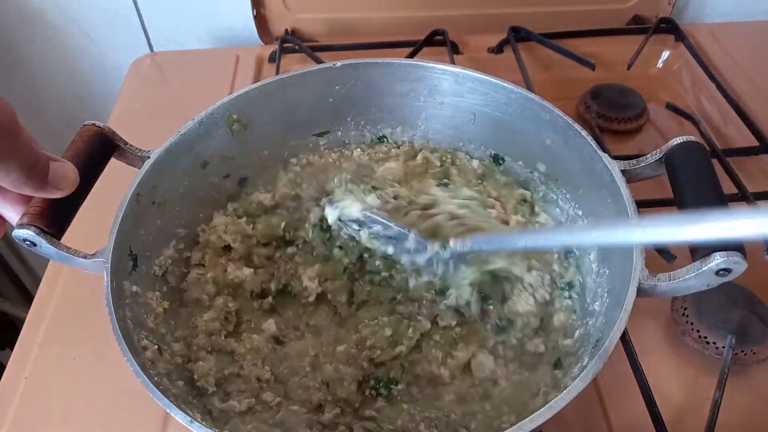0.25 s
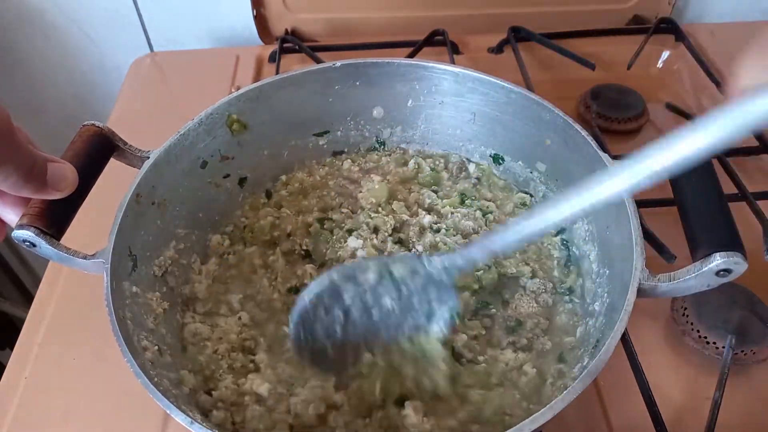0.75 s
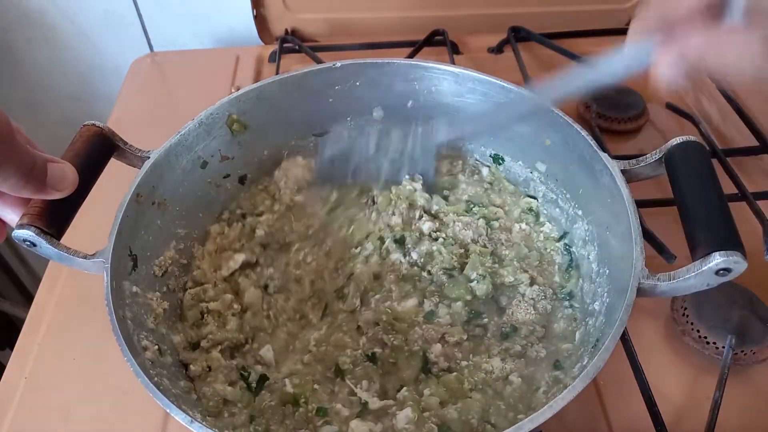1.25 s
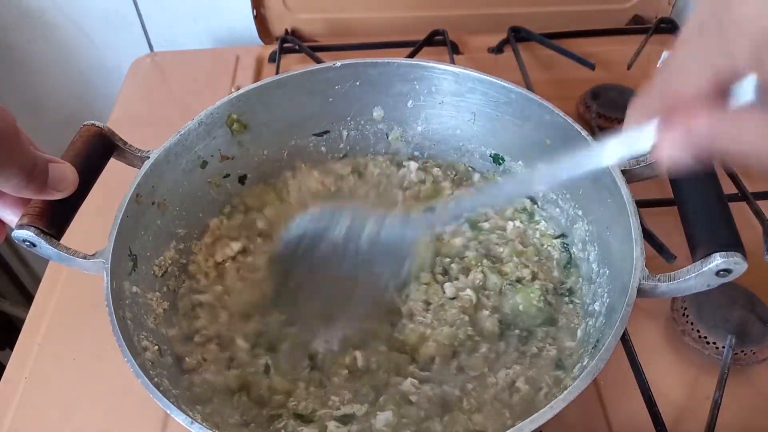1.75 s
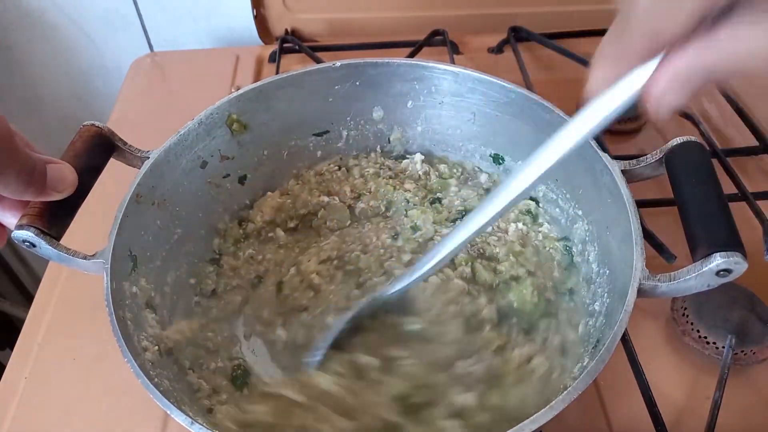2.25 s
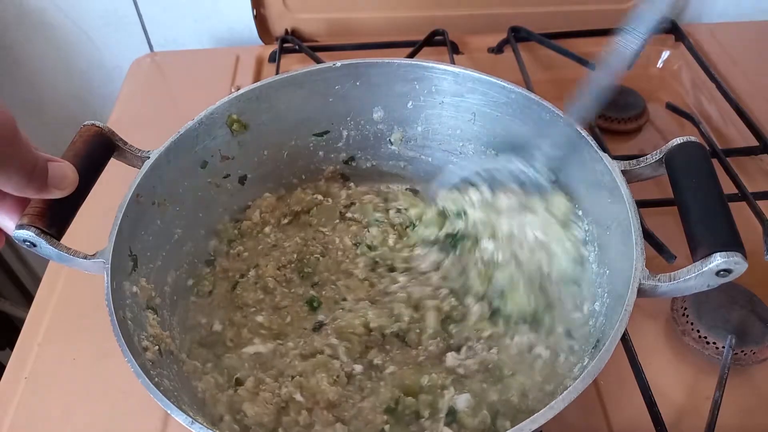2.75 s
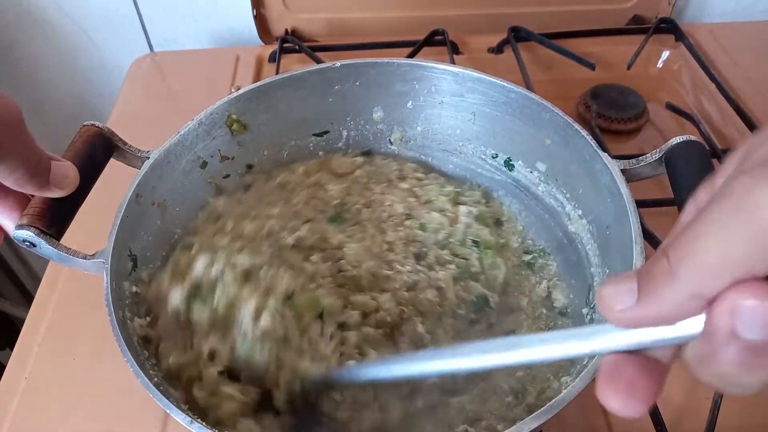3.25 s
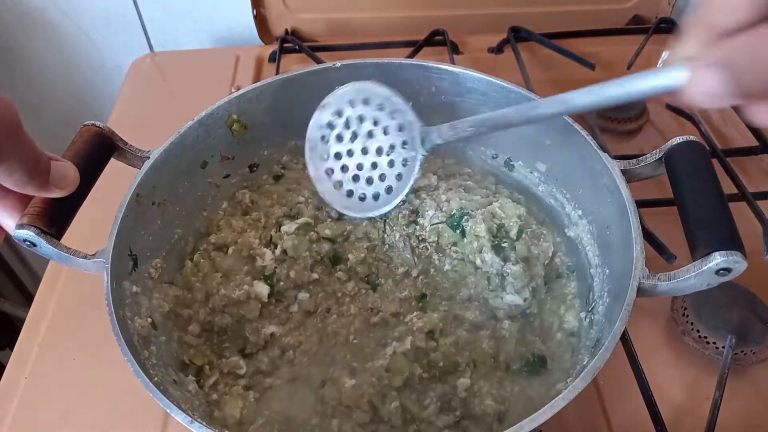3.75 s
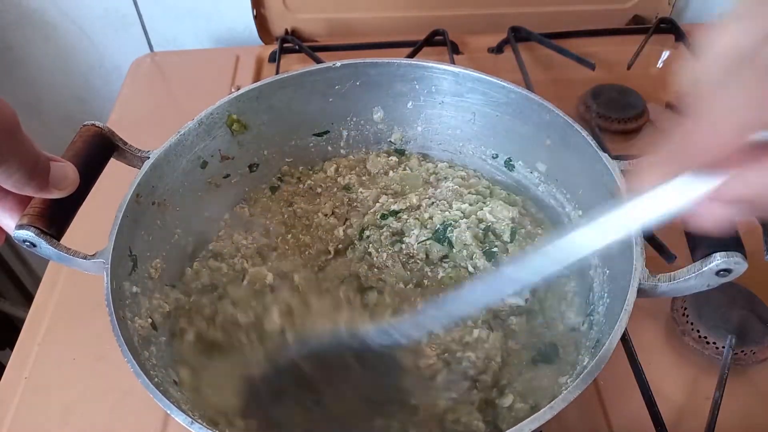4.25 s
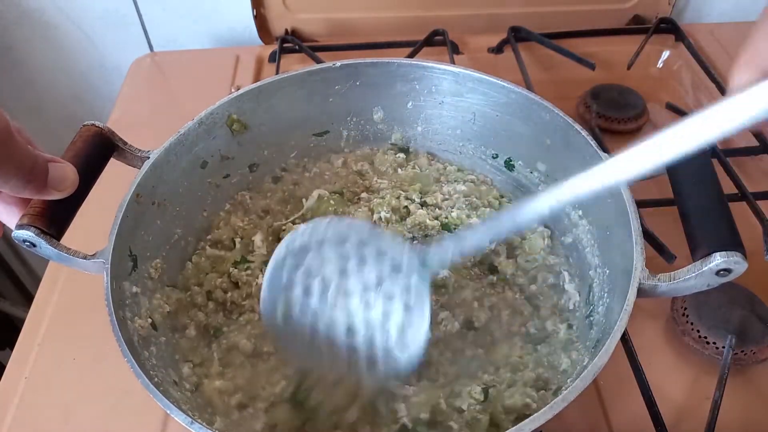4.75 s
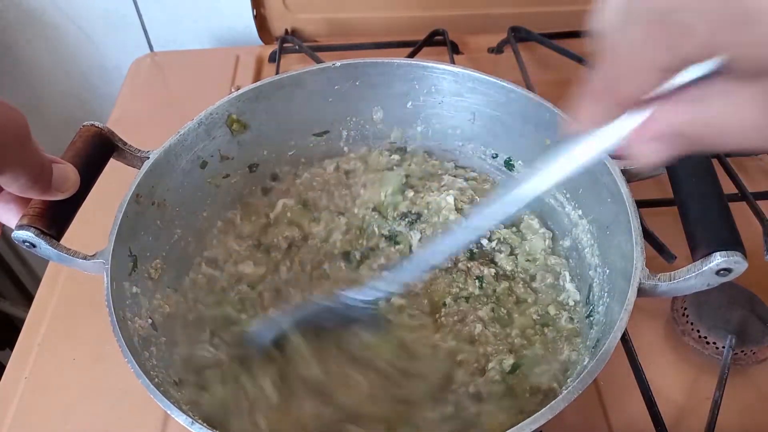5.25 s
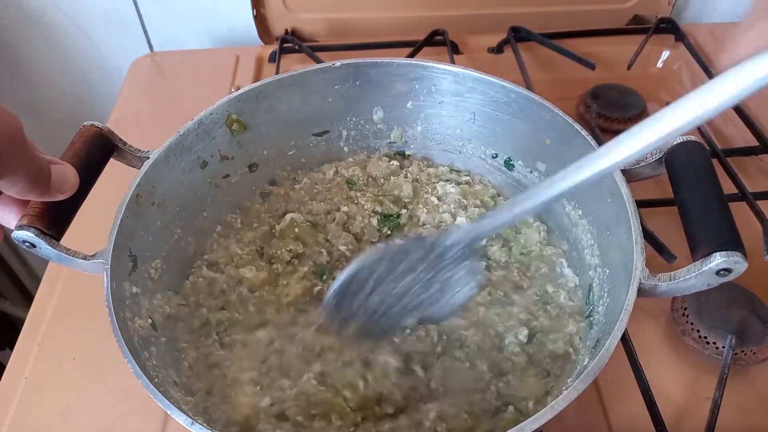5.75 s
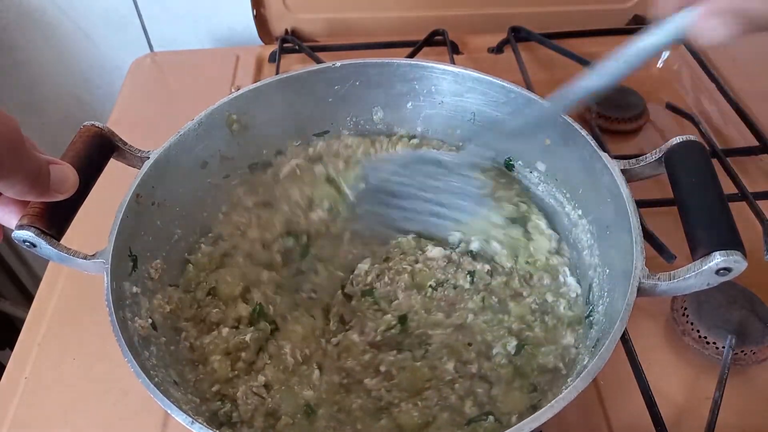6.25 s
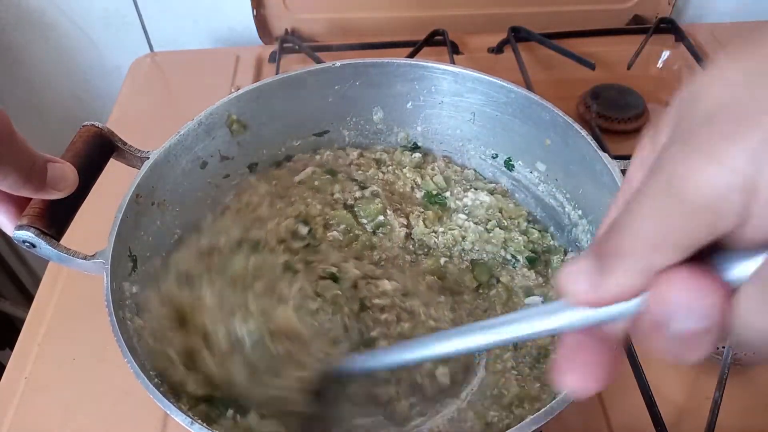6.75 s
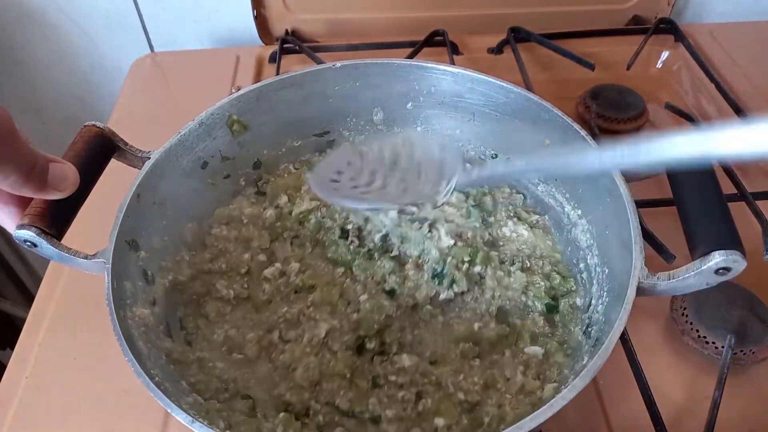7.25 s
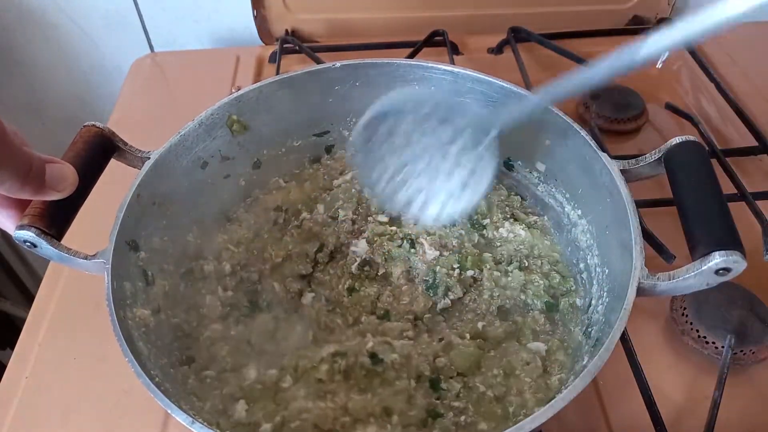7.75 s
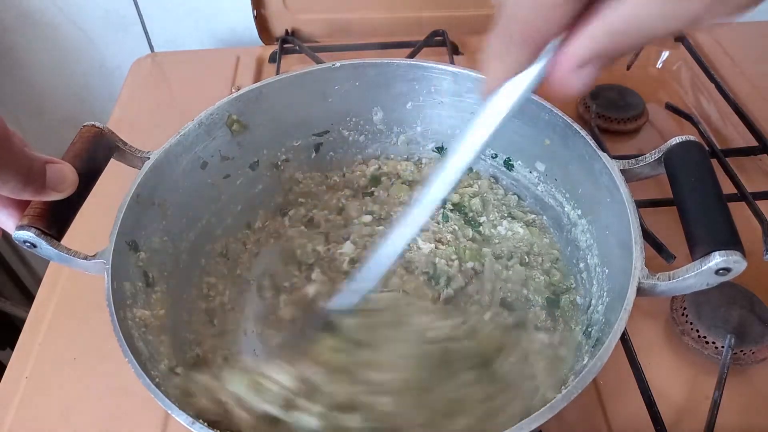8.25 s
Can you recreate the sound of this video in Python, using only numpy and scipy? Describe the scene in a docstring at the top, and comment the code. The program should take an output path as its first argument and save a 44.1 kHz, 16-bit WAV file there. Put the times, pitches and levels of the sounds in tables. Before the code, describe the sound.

A slotted metal spoon stirs thick wet mash in an aluminium pot, heard close in a hard-walled kitchen. After a few small clicks, the spoon knocks the pot about every third of a second from 0.6 to 2 seconds, each blow giving a short, damped metallic ring. A brief scrape follows, then a longer grinding, rasping drag from 2.6 to 3.2 seconds. A firm knock lands at 3.9 seconds. From about 4.3 to 6.2 seconds it is much quieter, with faint sticky squelches and a soft patter of falling lumps. Two knocks and another rough scrape run from 6.3 to 6.8 seconds. The loudest knock comes at 7.5 seconds, and a last knock and sharp scrape at about 8 seconds. The room rings briefly after each blow, over a low hush and a faint hum.

```python
"""Knocks and grinding scrapes: a slotted metal spoon stirs thick wet mash in an aluminium pot on a stove.
Each knock rings the pot's modes, damped by the mash. Dragged round the wall, the edge sticks and slips,
rasping where it bites bare metal. Between strokes the mash squelches faintly and drops off the spoon.
The hard-walled kitchen rings on after every blow, over a low hush and a faint hum."""
import sys
import numpy as np
from scipy import signal
from scipy.fft import rfft, irfft
from scipy.io import wavfile

SR = 44100
rng = np.random.default_rng(int(sys.argv[2]) if len(sys.argv) > 2 else 0)


def transcribe(u):
    """Save the signal u as a 16-bit wav file named by the first command-line argument.

    u: samples, shape (n,) or (channels, n), limited to [-1, 1]; the rate is SR.
    q: integer samples, one column per channel.
    """
    v = np.clip(np.atleast_2d(u).T, -1, 1)
    q = np.round(v * 32767).astype(np.int16)
    wavfile.write(sys.argv[1], SR, q)


N = 374409


def from_db(db):
    """Decibels to gain."""
    return 10 ** (np.asarray(db) / 20)


def unit_rms(x):
    """Scale to rms 1."""
    return x / np.sqrt(np.mean(x ** 2) + 1e-20)


def at_hz(points, hz):
    """Interpolate a table on a log-frequency axis."""
    f, value = np.transpose(points)
    return np.interp(np.log(np.maximum(hz, 1)), np.log(f), value)


def high_pass(x, hz):
    """Second-order Butterworth high-pass."""
    return signal.sosfilt(signal.butter(2, hz, "high", fs=SR, output="sos"), x)


def convolve(x, response):
    """Convolve per channel; shape (channels, N)."""
    return signal.oaconvolve(np.atleast_2d(x), np.atleast_2d(response), axes=-1)[:, :N]


def add(out, start_s, sound):
    """Mix sound into out at start_s."""
    i = max(round(start_s * SR), 0)
    out[i:i + len(sound)] += sound[:max(N - i, 0)]


def pulse(*colours, size=2048):
    """Minimum-phase pulse; its spectrum is the sum of the (f/Hz, level/dB) tables."""
    hz = np.arange(size // 2 + 1) * SR / size
    spectrum_db = sum(at_hz(colour, hz) for colour in colours)
    cepstrum = irfft(np.log(from_db(spectrum_db)))
    cepstrum[1:size // 2] *= 2
    cepstrum[size // 2 + 1:] = 0
    return irfft(np.exp(rfft(cepstrum)))


def unit_pulse(colour, *extras):
    """Pulse scaled to unit energy, then recoloured by the extras."""
    return pulse(colour, *extras) / np.linalg.norm(pulse(colour))


def envelope(contacts, attack_s, release_db_per_s, sag_db_per_s=0):
    """Power sum of contact envelopes: linear rise, sagging hold, exponential release."""
    power = np.zeros(N)
    for start_s, length_s, db in contacts:
        t = np.arange(N) / SR - start_s
        rise = np.clip(t / attack_s, 0, 1)
        fall_db = sag_db_per_s * np.maximum(t, 0) + release_db_per_s * np.maximum(t - length_s, 0)
        power += (rise * from_db(db - np.minimum(fall_db, 200))) ** 2
    return np.sqrt(power)


def drift(rate_hz):
    """Unit Gaussian values at rate_hz, joined linearly."""
    position = np.arange(N) * rate_hz / SR
    return np.interp(position, np.arange(N), rng.standard_normal(N))


def grains(per_s, spread_db, clump_db, clump_hz):
    """Random clicks of uneven size, swelling in clumps; rms 1."""
    fires = rng.random(N) < per_s / SR
    size_db = spread_db * np.minimum(rng.exponential(1, N), 4) + clump_db * drift(clump_hz)
    return unit_rms(fires * from_db(size_db) * rng.choice([-1, 1], N))


def stereo_noise(size):
    """White stereo noise, correlated in the bass, nearly independent in the treble."""
    # room sound field: f/Hz, left-right correlation
    coherence = [(60, 0.48), (250, 0.95), (500, 0.76), (900, -0.13), (2000, 0.023), (8000, 0.1)]
    mid, side = rfft(rng.standard_normal((2, size)))
    alike = np.clip(at_hz(coherence, np.arange(len(mid)) * SR / size), -1, 1)
    return irfft(np.sqrt((1 + alike) / 2) * mid + np.sqrt((1 - alike) / 2) * side * [[1], [-1]], size)


def hush(rms_db):
    """Steady kitchen background, mostly bass."""
    # noise spectrum: f/Hz, level/dB
    colour = [(25, -23), (45, -4.5), (75, 5), (100, -1), (170, -8), (300, -11.5), (480, -11.5),
              (650, -20.5), (1000, -27.5), (4000, -35), (5300, -28), (7000, -24.5), (11000, -18),
              (16000, -31.5)]
    return from_db(rms_db) * unit_rms(convolve(stereo_noise(N), pulse(colour)))


def hum(rms_db, centre_hz, width_hz):
    """Faint wavering hum: noise in one narrow resonance."""
    r, w = np.exp(-np.pi * width_hz / SR), 2 * np.pi * centre_hz / SR
    band = signal.lfilter([1, 0, -1], [1, -2 * r * np.cos(w), r * r], stereo_noise(N))
    return from_db(rms_db) * unit_rms(band)


def kitchen(x, room_db, early_db, early_s, early_hz, build_s, right_db, right_lag_samples=4):
    """Direct sound, quick scatter off pot and stove, two wall echoes, a tail dying band by band."""
    # tail decay: f/Hz, t60/s
    t60s = [(100, 1), (350, 0.78), (700, 0.56), (2000, 0.59), (4000, 0.48), (7000, 0.41), (14000, 0.37)]
    # tail spectrum, weak in the treble: f/Hz, level/dB
    colour = [(100, 2.5), (500, -1.5), (2000, 4.5), (5000, -2.5), (12000, -4)]
    # nearest walls: delay/s, level/dB
    echoes = [(.0092, -13), (0.0571, -15.5)]
    t, hz = np.arange(SR) / SR, np.arange(SR // 2 + 1)
    centres_hz = np.geomspace(80, 16000, num=12)
    spectrum, tail = rfft(stereo_noise(SR)), 0
    for centre_hz, share in zip(centres_hz, np.eye(len(centres_hz))):
        band = irfft(spectrum * at_hz(np.c_[centres_hz, share], hz), SR)
        tail += band * from_db(at_hz(colour, centre_hz) - 60 * t / at_hz(t60s, centre_hz))
    tail *= 1 - np.exp(-t / build_s)
    # small objects scatter only short waves
    early = high_pass(stereo_noise(SR) * np.exp(-t / early_s), early_hz)
    response = (from_db(room_db) * unit_rms(tail) + from_db(early_db) * unit_rms(early)) / np.sqrt(SR)
    for delay_s, db in echoes:
        dull_echo = signal.lfilter([0.25], [1, -0.75], signal.unit_impulse(SR, round(delay_s * SR)))
        response += from_db(room_db + db) * dull_echo
    response[0, 0] += 1  # direct path
    response[1, right_lag_samples] += 1
    return convolve(x, response) * from_db([[-right_db / 2], [right_db / 2]])


def squelches(crackle_db, push_gain_db):
    """Wet crumbs part in tiny sticky clicks: a constant crackle that swells as the spoon pushes."""
    # spoon pushes: centre t/s, half-length/s, level/dB, extra low end/dB
    pushes = [(4.579, 0.19, -67.5, -8), (4.913, 0.17, -65.5, -1), (5.142, 0.044, -62.5, -3.5),
              (5.276, 0.025, -69.5, 6.5), (5.65, 0.17, -61.5, -1), (6.005, 0.092, -65.5, -2.5),
              (6.262, 0.18, -68, -3.5), (7.04, 0.11, -66, 5)]
    # sticky click: f/Hz, level/dB
    colour = [(300, -11.5), (1200, -5), (3500, -12.5), (5500, 2), (7000, 1), (11000, 1), (16000, 3.5)]
    crumbs = grains(per_s=1900, spread_db=6, clump_db=6.5, clump_hz=410)
    crackle = crumbs * from_db(crackle_db + drift(rate_hz=13))  # wavers about 1 dB
    out = convolve(crackle, unit_pulse(colour))[0]
    for centre_s, half_s, db, low_db in pushes:
        first = max(round((centre_s - half_s) * SR), 0)
        stretch = crumbs[first:first + round(2 * half_s * SR)]
        swell = stretch * np.hanning(len(stretch))
        click = unit_pulse(colour, [(2500, low_db), (5000, 0)])
        add(out, centre_s - half_s, from_db(db + push_gain_db) * signal.fftconvolve(swell, click))
    return out


def plops(gain_db):
    """Lumps drop off the spoon and land as a short, dull patter of crumbs."""
    # landings: t/s, length/s, level/dB
    landings = [(3.642, 0.046, -60.5), (5.59, 0.018, -65), (5.697, 0.0072, -70.5)]
    # soft impact: f/Hz, level/dB
    colour = [(150, -6), (450, 6), (750, 0.5), (1100, 1), (1550, -1), (1900, -12), (2350, -5.5),
              (3200, -29), (8000, -38)]
    patter = envelope(landings, attack_s=0.0063, release_db_per_s=448)
    patter *= grains(per_s=1600, spread_db=1.5, clump_db=-3, clump_hz=43)
    return from_db(gain_db) * convolve(patter, unit_pulse(colour))[0]


def ticks(gain_db):
    """Small bright clicks: light spoon touches and bursting wet pockets."""
    # clicks: t/s, level/dB, extra treble/dB
    clicks = [(0.0687, -14.5, -2), (0.1196, -31, 15), (0.2998, -22.5, 10), (2.586, -31, -15),
              (3.2668, -15, -3.5), (3.3622, -18, 7.5), (4.173, -17.5, 3), (4.5643, -33, -14.5),
              (5.1628, -29, -6), (6.9423, -28, 1), (7.0174, -29, -12), (7.4782, -18, -4)]
    # click spectrum: f/Hz, level/dB
    colour = [(200, -17), (900, -8), (2200, -8.5), (4000, 0), (5800, 3.5), (8000, 2), (14000, 6),
              (17000, -2.5)]
    out = np.zeros(N)
    for start_s, db, treble_db in clicks:
        add(out, start_s, from_db(db + gain_db) * unit_pulse(colour, [(6500, 0), (13000, treble_db)]))
    return out


def pot(force, ring_db, wander_db):
    """The wall follows the force and rings in modes whose shares wander with the spot touched."""
    # modes of the filled pot: f/Hz, level/dB, t60/s
    modes = [(334, -4, 0.3), (411, -5.5, 0.35), (492, 4, 0.16), (529.7, 1.5, 0.066), (610, 1.5, 0.33),
             (648.3, 1.5, 0.31), (867, -12.5, 0.17), (1056, 1, 0.17), (1160, -11, 0.041),
             (1306, -7.5, 0.21), (1417, -6, 0.15), (1646, 2, 0.12), (1835, 1.5, .18), (2074, -3.5, 0.26),
             (2400, -1.5, 0.17), (2630, -7.5, .09), (3120, -8, 0.14), (3410, -0.5, .07), (6000, -1.5, .025)]
    out = force.copy()
    for hz, db, t60_s in modes:
        r, w = from_db(-60 / (t60_s * SR)), 2 * np.pi * hz / SR
        drive = force * from_db(ring_db + db + wander_db * drift(rate_hz=0.89))
        out += signal.lfilter([1, -r * np.cos(w)], [1, -2 * r * np.cos(w), r * r], drive + 1e-18)
    return out


def judder(gain_db):
    """Pressed hard, the edge skips along the wall and shakes the spoon's bowl at its own pitch."""
    # runs of skips: t/s, length/s, level/dB
    runs = [(2.96, .14, -36.5), (6.66, 0.051, -40)]
    # bowl resonance: f/Hz, level/dB
    colour = [(400, -30), (850, -6), (1150, 8.5), (1350, 5), (1700, -17), (4000, -6)]
    skips = envelope(runs, attack_s=0.013, release_db_per_s=400)
    skips *= grains(per_s=700, spread_db=2, clump_db=1.5, clump_hz=40)
    return from_db(gain_db) * convolve(skips, unit_pulse(colour))[0]


def scrapes(grind_db, rasp_db, glide_db):
    """Stick-slip of the edge: coarse slips grind the wall; fine ones rasp, most where it bites."""
    # drags along the wall: t/s, length/s, level/dB
    strokes = [(-0.2, 0.17, -36.5), (2.04, 0.058, -27), (2.635, 0.52, -31), (6.335, 0.39, -28),
               (7.99, 0.185, -28)]
    # edge cuts through to bare metal: t/s, length/s, level/dB
    bites = [(2.085, 0.034, -26), (2.67, 0.11, -24), (2.895, 0.029, -28), (3.105, 0.049, -22.5),
             (6.42, 0.15, -24.5), (6.795, 0.033, -33), (8.06, 0.064, -24.5), (8.125, 0.021, -16)]
    # coarse slip: f/Hz, level/dB
    grind_colour = [(60, -14.5), (140, -10), (210, -18), (330, -7.5), (550, 1.5), (1200, -2), (1900, -7),
                    (3000, -15.5), (8000, -32)]
    # fine slip: f/Hz, level/dB
    rasp_colour = [(300, -22), (1500, -10), (2700, -7.5), (3700, -1), (4800, -4), (6300, -4), (8000, -1.5),
                   (11000, -1), (16000, -5)]
    drag = envelope(strokes, attack_s=0.036, release_db_per_s=192.5, sag_db_per_s=4)
    bite = envelope(bites, attack_s=0.014, release_db_per_s=700)
    glide = from_db(glide_db) * drag
    coarse = drag * grains(per_s=1400, spread_db=3, clump_db=2.5, clump_hz=60)
    fine = np.hypot(glide, bite) * grains(per_s=2700, spread_db=5, clump_db=3.5, clump_hz=80)
    grind = from_db(grind_db) * convolve(coarse, unit_pulse(grind_colour))[0]
    rasp = from_db(rasp_db) * convolve(fine, unit_pulse(rasp_colour))[0]
    return grind + rasp


def knocks(gain_db, buzz_db, buzz_s, buzz_hz, spot_db, spot_ratio, size=1024):
    """Each blow is one sharp push dispersing through the wall, plus a brief buzz of the spoon's edge."""
    # spoon hits pot: t/s, level/dB, extra thud/dB, extra clack/dB, extra treble/dB, struck spot f/Hz
    blows = [(0.5648, -2, 5, 3.5, 2.5, 636), (0.617, -4, 1, 4, -2, 599), (0.9638, 2.5, -2.5, 2, 2.5, 5760),
             (1.323, 5.5, -1.5, -1.5, -0.5, 1690), (1.738, -3, -2, -1.5, 0, 536),
             (2.0102, 9, 1.5, 0, 2, 1000), (2.6298, -17.5, 11.5, 8.5, 7, 5870),
             (3.892, 7.5, 1.5, -1, -3, 501), (6.3268, -1, 2, -2, -2, 700),
             (6.3951, -9.5, -1, 10, 15.5, 6050), (7.507, 12, -0.5, -2, 0.5, 385),
             (7.97, 0, 5.5, 0.5, 1.5, 1034)]
    # contact spectrum: f/Hz, level/dB
    colour = [(50, -25), (130, -20.5), (210, -20), (300, -8), (520, -1), (800, -2.5), (1150, -4.5),
              (1800, -10.5), (3200, -11.5), (4700, -13), (6500, -12), (11000, -7.5), (16000, -19)]
    t, hz = np.arange(size) / SR, np.arange(size // 2 + 1) * SR / size
    delay_1khz_s = 0.000597  # bending waves: delay ~ 1/sqrt(f), highs first
    bend = irfft(np.exp(-4j * np.pi * delay_1khz_s * np.sqrt(1000 * hz)))
    out = np.zeros(N)
    for start_s, db, thud_db, clack_db, treble_db, spot_hz in blows:
        buzz = high_pass(rng.standard_normal(size) * np.exp(-t / buzz_s), buzz_hz)
        contact = bend + from_db(buzz_db) * buzz / np.linalg.norm(buzz)
        tilt = [(300, thud_db), (480, 0), (680, 0),
                (1000, clack_db), (2000, clack_db), (4200, treble_db)]
        spot_peak = [(spot_hz / spot_ratio, 0), (spot_hz, spot_db), (spot_hz * spot_ratio, 0)]
        blow = signal.fftconvolve(contact, unit_pulse(colour, tilt, spot_peak))
        add(out, start_s, from_db(db + gain_db) * blow)
    return out


def scene():
    """Spoon, pot and mash in the kitchen, over hush and hum."""
    hits = knocks(gain_db=-0.5, buzz_db=-12, buzz_s=0.0027, buzz_hz=1386, spot_db=4, spot_ratio=1.26)
    struck = pot(hits, ring_db=-53, wander_db=3.5)
    friction = scrapes(grind_db=-13, rasp_db=-9.5, glide_db=-3.5) + judder(gain_db=-5)
    rubbed = pot(friction + plops(gain_db=-5.5), ring_db=-58, wander_db=1.5)
    blows = kitchen(struck, room_db=3.5, early_db=0.5,
                    early_s=0.0058, early_hz=810, build_s=0.0018, right_db=0.5)
    strokes = kitchen(rubbed, room_db=0, early_db=3.5,
                      early_s=0.017, early_hz=680, build_s=0.003, right_db=0.5)
    touches = kitchen(ticks(gain_db=-2), room_db=-3, early_db=3.5,
                      early_s=0.0028, early_hz=790, build_s=0.0025, right_db=0)
    mash = kitchen(squelches(crackle_db=-75.5, push_gain_db=-2.5), room_db=-1.5, early_db=7,
                   early_s=0.0044, early_hz=785, build_s=0.0046, right_db=-1)
    background = hush(rms_db=-63) + hum(rms_db=-75.5, centre_hz=478, width_hz=11)
    return background + mash + touches + strokes + blows


def record(dry):
    """Microphone colour, soft clipping, steep low-pass."""
    # microphone, deep bass shed, top octave stepped down: f/Hz, level/dB
    microphone = [(22, -19.5), (50, -0.5), (6850, 0), (7350, -17.5)]
    ceiling, cutoff_hz = 0.9, 16200
    rounded = ceiling * np.tanh(convolve(dry, pulse(microphone)) / ceiling)
    return signal.sosfilt(signal.ellip(10, 0.1, 80, cutoff_hz, fs=SR, output="sos"), rounded)


dry = scene()
out = record(dry)
transcribe(out)
```